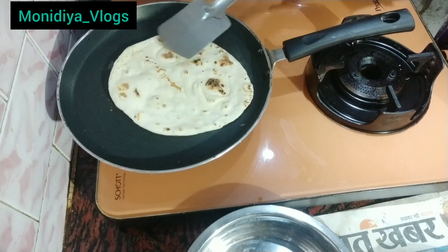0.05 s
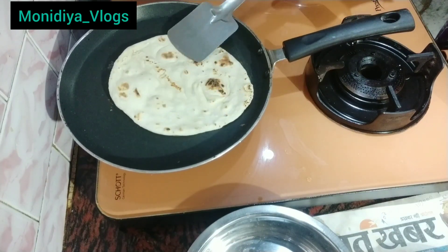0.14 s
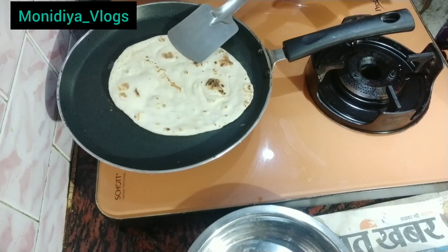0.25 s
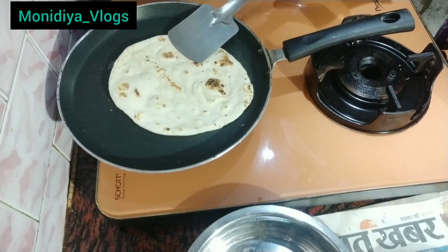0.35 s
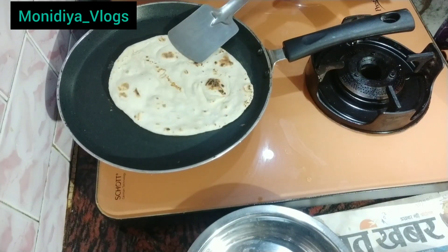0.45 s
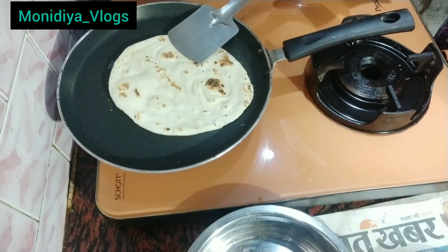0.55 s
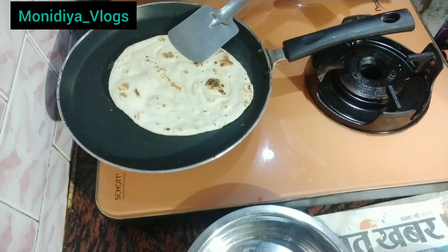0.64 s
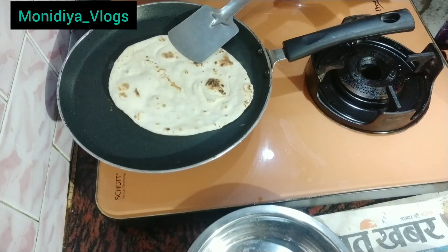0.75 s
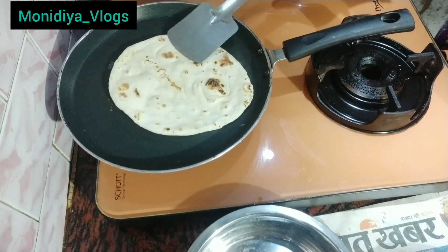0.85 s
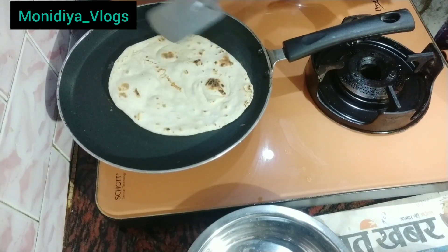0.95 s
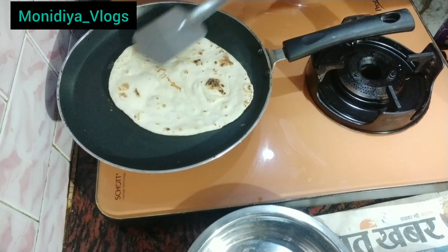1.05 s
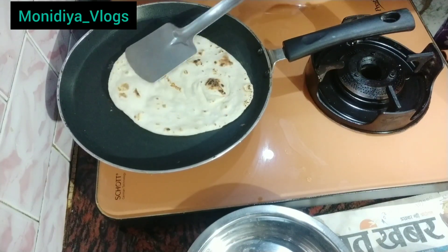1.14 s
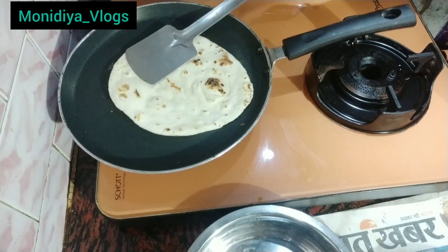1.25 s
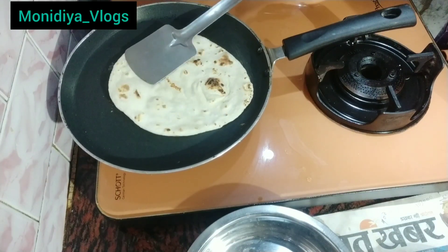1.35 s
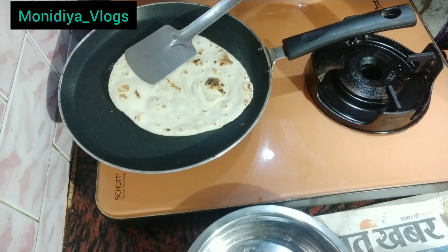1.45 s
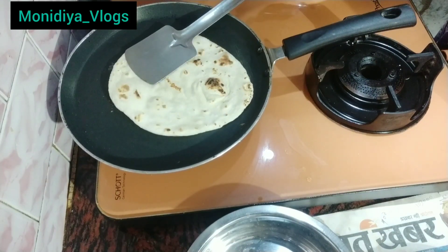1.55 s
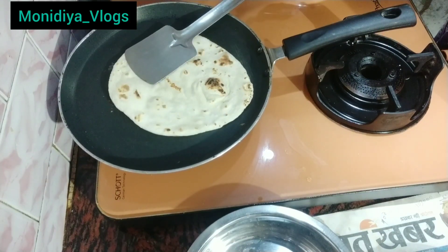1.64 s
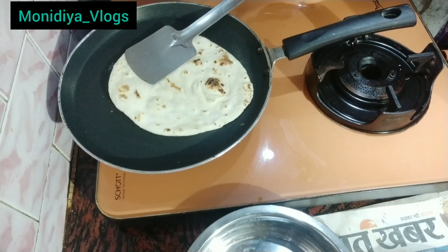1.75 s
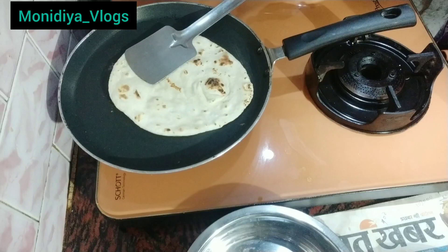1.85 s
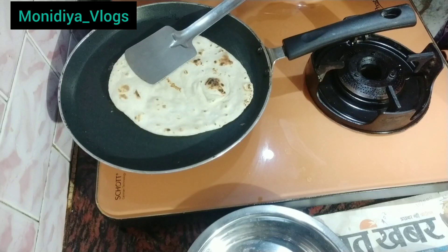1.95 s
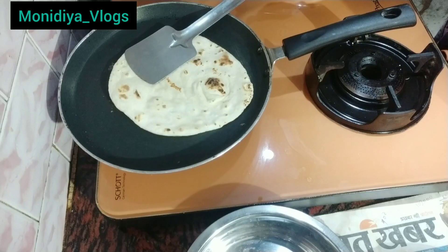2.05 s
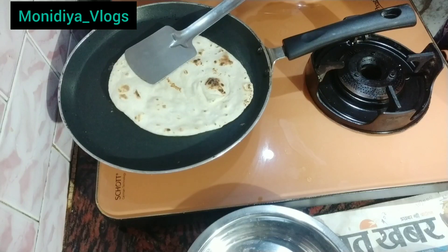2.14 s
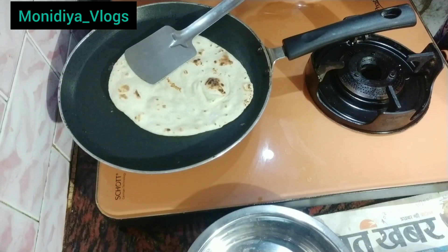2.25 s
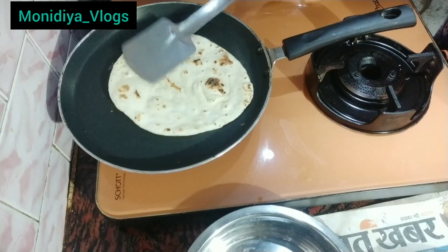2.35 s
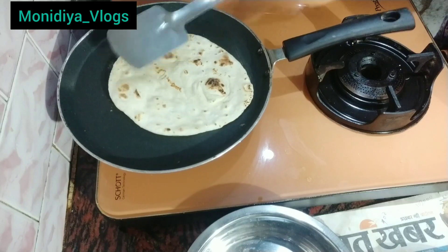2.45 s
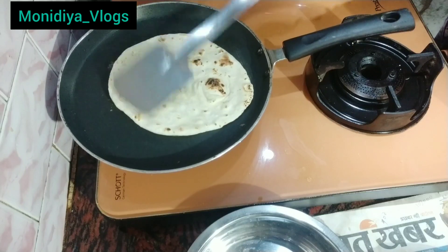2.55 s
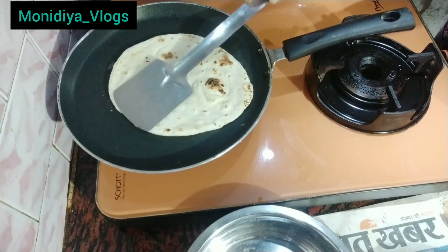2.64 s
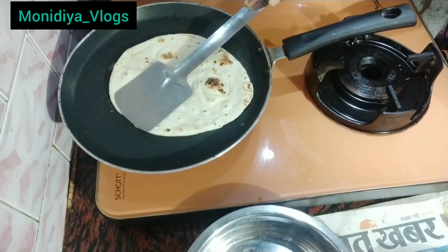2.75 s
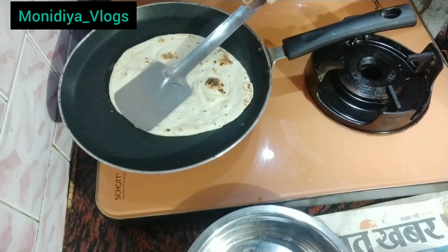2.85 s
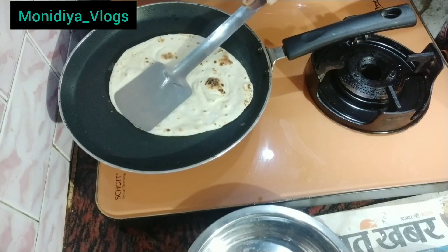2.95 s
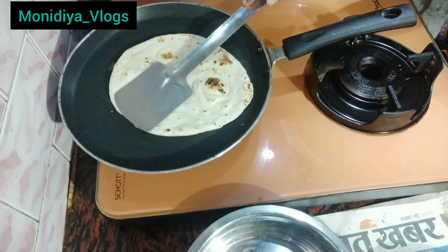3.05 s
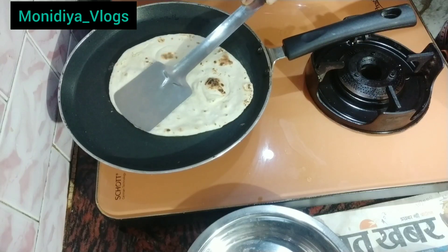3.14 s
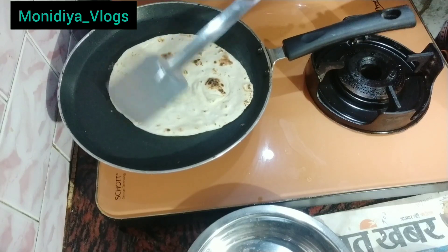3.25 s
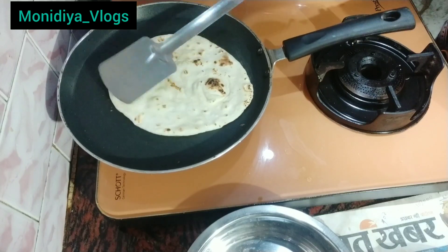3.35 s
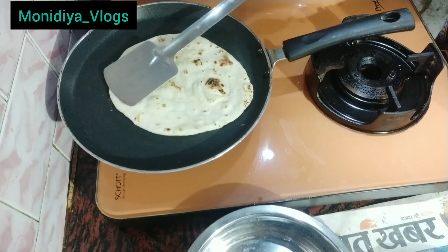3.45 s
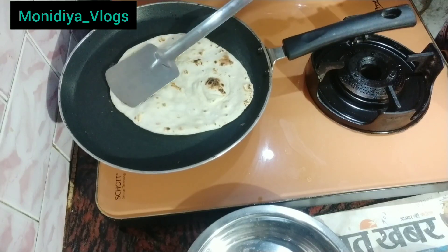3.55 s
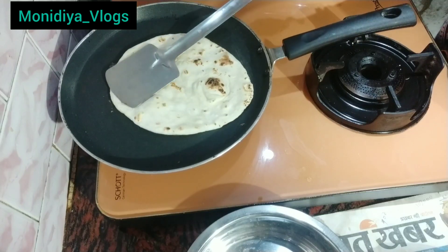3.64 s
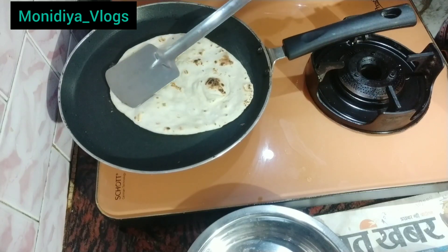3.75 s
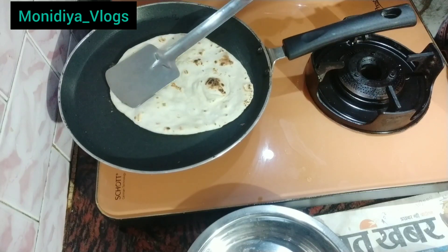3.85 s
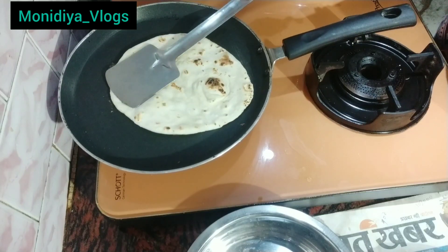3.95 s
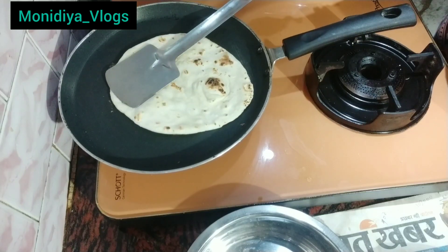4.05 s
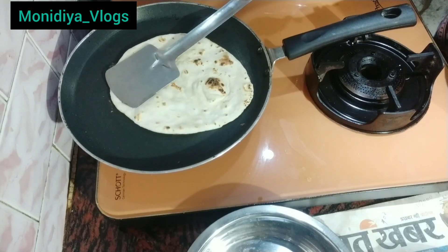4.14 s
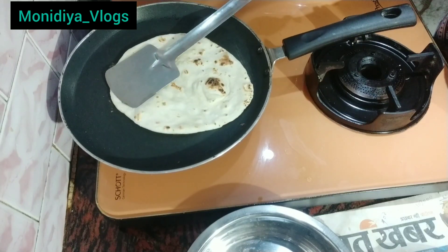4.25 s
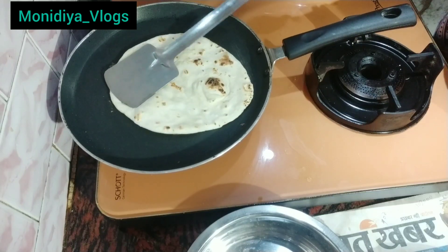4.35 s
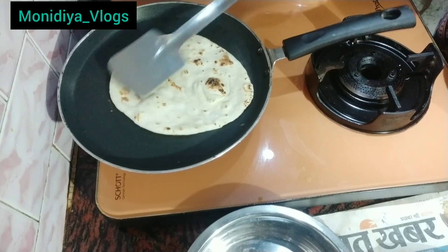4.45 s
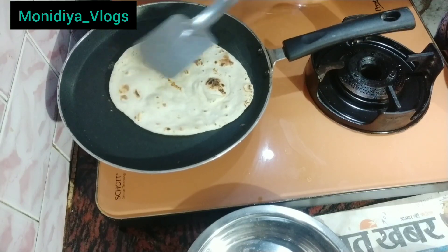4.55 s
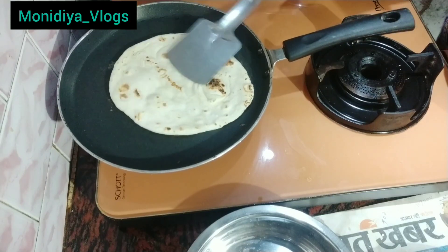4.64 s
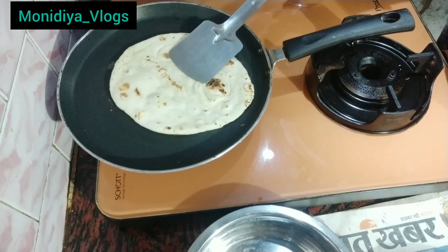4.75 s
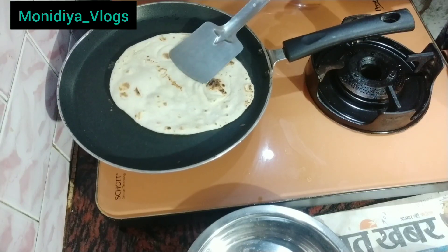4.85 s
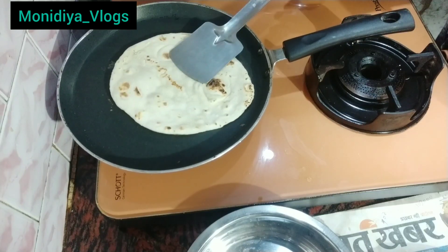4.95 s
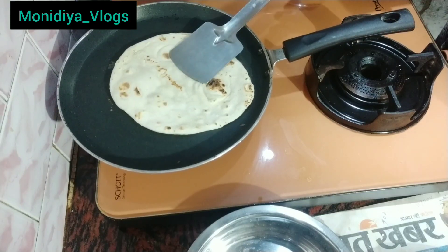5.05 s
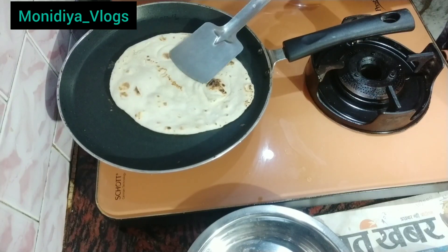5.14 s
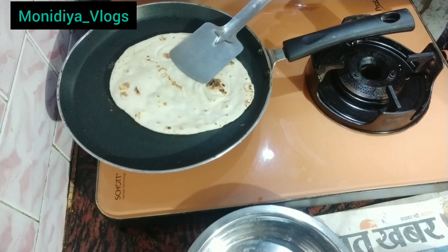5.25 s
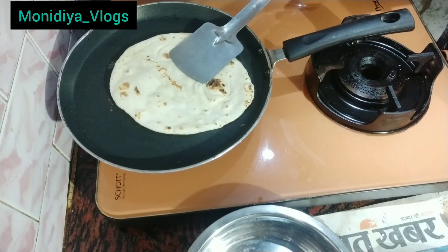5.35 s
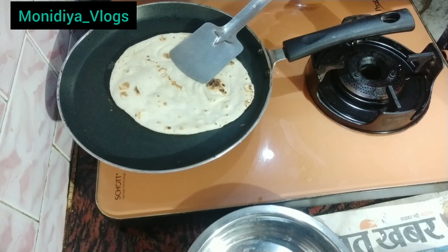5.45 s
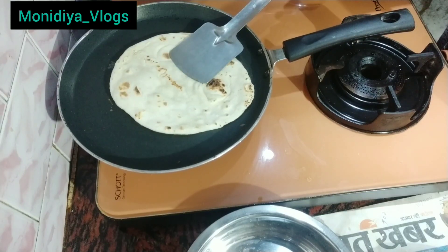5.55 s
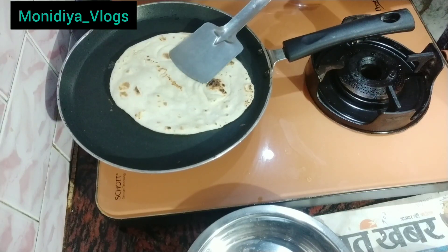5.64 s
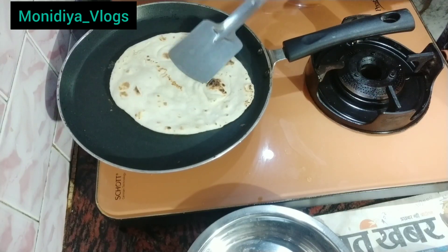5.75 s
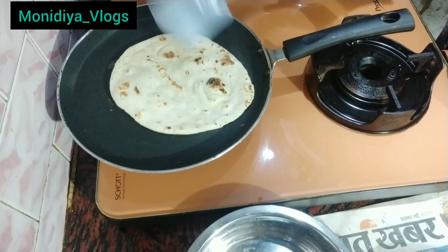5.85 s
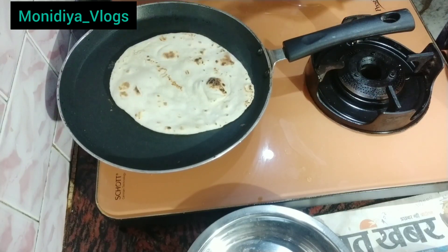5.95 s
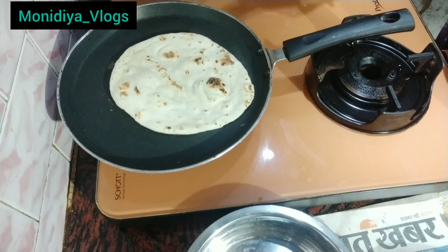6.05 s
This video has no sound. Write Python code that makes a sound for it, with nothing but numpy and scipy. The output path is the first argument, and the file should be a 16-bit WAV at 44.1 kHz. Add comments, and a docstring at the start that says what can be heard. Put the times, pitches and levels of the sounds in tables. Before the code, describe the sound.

A metal spatula knocks and clatters against a pan in bursts while flatbread crackles and sizzles softly over a low burner murmur in a tiled kitchen.

```python
"""A burner and a street murmur, with a thin motor whine and the sizzle of flatbread in a hot pan.
Throughout, crackles (steam bursts of shaped noise) mix with the knocks, bounces and presses of a steel
spatula: struck modes ring its edge, its blade and the pan, noise makes the rattle, in a tiled kitchen.
Faint gliding sines and a whistle come from outdoors; steps in the left line make electrical ticks.
Two microphone ports hear the scene; the right one faces the pan and is much brighter."""
import sys
import numpy as np
from scipy import signal
from scipy.fft import rfft, irfft, next_fast_len
from scipy.io import wavfile
from scipy.ndimage import uniform_filter1d

SR = 44100
rng = np.random.default_rng(int(sys.argv[2]) if len(sys.argv) > 2 else 0)


def to_wav(s):
    """Save 16-bit WAV."""
    ch = np.atleast_2d(s).T  # columns
    pcm = np.round(np.clip(ch, -1, 1) * 32767)  # PCM
    wavfile.write(sys.argv[1], SR, pcm.astype(np.int16))


N = 268701  # length [samples]


def amp(db):
    """Decibels to a linear gain."""
    return 10 ** (np.asarray(db) / 20)


def evened(x):
    """Scale to an rms of one."""
    return x / np.sqrt(np.mean(x ** 2) + 1e-20)


def read(points, hz):
    """Read a curve at the given frequencies, straight between points on a log frequency axis."""
    f, value = np.transpose(points)
    return np.interp(np.log(hz + 1), np.log(f + 1), value)


def add(mix, s, sound):
    """Lay a sound into the mix from time s, cut at the end of the mix."""
    part = mix[..., round(s * SR):][..., :sound.shape[-1]]
    part += sound[..., :part.shape[-1]]


def smooth_noise(shape, samples):
    """Slow random movement with an rms of one."""
    return evened(uniform_filter1d(rng.standard_normal(shape), samples))


# left-right likeness of steady noise, before each layer scales it: (frequency [Hz], likeness [0-1])
NOISE_LIKENESS = [(60, 1), (150, 0.67), (380, 0.71), (950, 0.046), (2380, 0.033), (5980, 0.03),
                  (15000, 0.02)]
# left port against right, before any shadow factor: (frequency [Hz], level difference [dB])
LEFT_DB = [(120, -6), (300, -0.5), (700, -1.5), (1300, 1.55), (2400, -2), (4400, -6), (6500, -5.5),
           (9000, -17), (12000, -13.5), (15000, -5)]


def hiss(colour, likeness, patchy_db):
    """Two-port noise shaped in frequency, with patches of level that drift over time and pitch."""
    frames, hz = N // 256 + 5, np.fft.rfftfreq(1024, 1 / SR)
    a, b, c, d, patches = rng.standard_normal((frames, 513, 5)).T
    patches = evened(uniform_filter1d(uniform_filter1d(patches, 8, 0), 10, 1))
    same = np.clip(likeness * read(NOISE_LIKENESS, hz), -1, 1)[:, None]
    right, own = a + 1j * b, c + 1j * d
    left = same * right + np.sqrt(1 - same ** 2) * own
    left = left * amp(read(LEFT_DB, hz))[:, None]
    shape = amp(read(colour, hz)[:, None] + patchy_db * patches)
    spectra = np.array([left, right]) * shape
    return evened(signal.istft(spectra, nperseg=1024, noverlap=768)[1][:, :N])


# burner and street colour: (frequency [Hz], relative density [dB per Hz])
MURMUR_COLOUR = [(18, -71), (30, 10.5), (112, -53), (167, -2.5), (331, -4), (694, -15.5), (904, -16.5),
                 (1660, -23.5), (2530, -24), (3130, -18.5), (3470, -28), (4410, -26.5), (13000, -19),
                 (15200, -24.5), (16500, -62)]


def murmur():
    """Burner and street as one steady, patchy noise, heavy in the bass."""
    return amp(-48) * hiss(MURMUR_COLOUR, 1.334, patchy_db=2.27)


# swell of the frying, shared by the sizzle and the small pops: (time [s], relative level [dB])
SIZZLE_SWELL = [(0.0, -49.5), (0.17, -55.5), (0.96, -59), (1.19, -52), (1.33, -45.5), (1.55, -55),
                (2.4, -56.5), (2.65, -46), (2.83, -47), (3.14, -53), (3.37, -60), (3.49, -47),
                (3.78, -57.5), (4.15, -55), (4.58, -49), (4.9, -54.5), (5.75, -49), (6.09, -63)]
# colour of the frying: (frequency [Hz], relative density [dB per Hz])
SIZZLE_COLOUR = [(2060, -25), (3500, -3), (6070, -4.5), (6520, -8), (8510, 1.5), (13800, -6.5),
                 (16000, -16), (16500, -77)]


def sizzle_gain(trim_db):
    """The frying level over time, as a gain."""
    return amp(np.interp(np.arange(N) / SR, *np.transpose(SIZZLE_SWELL)) + trim_db)


def sizzle():
    """The frying bread as bright noise that swells and sinks."""
    return sizzle_gain(-9.5) * hiss(SIZZLE_COLOUR, .3, patchy_db=0.0)


# left-right likeness of reflections, rattles and bursts: (frequency [Hz], likeness [0-1])
BURST_LIKENESS = [(100, 0.99), (500, 0.77), (900, 0.16), (1500, 0), (15000, 0)]


def burst(colour_db, noise):
    """Noise of a given colour (dB per frequency bin) at both ports, alike in the bass only."""
    left, right = rfft(noise)
    same = np.clip(read(BURST_LIKENESS, np.linspace(0, SR / 2, len(left))), 0, 1) ** 0.79
    left = same * right + np.sqrt(1 - same ** 2) * left
    return evened(irfft(np.array([left, right]) * amp(colour_db)))


def small_pops():
    """Random tiny pops, about 250 a second in six shapes, whose level follows the sizzle."""
    size = amp(2.7 * np.minimum(rng.exponential(1, N), 4)) * (rng.random(N) < 250 / SR)
    kind, t = rng.integers(0, 6, N), np.arange(400) / SR
    colour_db = 1.1 * read(SIZZLE_COLOUR, np.fft.rfftfreq(400, 1 / SR))
    out = np.zeros((2, N))
    for k, noise in enumerate(rng.standard_normal((6, 2, 400))):
        pop = burst(colour_db, noise) * amp(-60 * t / 0.0096)
        out += signal.oaconvolve((size * (kind == k))[None], pop, axes=1)[:, :N]
    return sizzle_gain(-4.0) * evened(out)


def tone(start, end, hz0, hz1, db0, db1, waver, fade):
    """A faint sine that glides evenly and flutters in level and pitch."""
    t = np.arange(0, end - start, 1 / SR)
    level_flutter, phase_flutter = smooth_noise(len(t), 600), smooth_noise(len(t), 600)
    phase = 2 * np.pi * np.cumsum(np.linspace(hz0, hz1, len(t))) / SR
    wave = np.sqrt(2) * np.sin(phase + waver * phase_flutter)
    level = amp(np.linspace(db0, db1, len(t))) * (1 + waver * level_flutter)
    edges = np.minimum(np.minimum(t, t[::-1]) / fade, 1)
    return start, level * wave * edges


# partials of the motor whine: (frequency [Hz], level [dB rms before the ports])
WHINE = [(3020, -64), (3171, -66.5), (3268, -69)]


def whine():
    """Steady high sines of a motor, wavering slightly."""
    out = np.zeros(N)
    for hz, db in WHINE:
        add(out, *tone(0, N / SR, hz, hz, db, db, waver=0.041, fade=.001))
    return out


# far tones: (start [s], end [s], start pitch [Hz], end pitch [Hz], start level [dB], end level [dB])
FAR_TONES = [(0.0, 0.497, 932, 935, -64, -70), (1.8, 2.04, 770, 792, -65, -65),
             (2.04, 2.398, 832, 872, -57.5, -69), (5.5, 6.091, 822, 910, -70, -62.5),
             (5.981, 6.11, 696, 633, -59, -48)]


def far_tones():
    """Gliding sines from outdoors."""
    out = np.zeros(N)
    for row in FAR_TONES:
        add(out, *tone(*row, waver=0.17, fade=0.015))
    return out


# colour of a steam burst before its tilt: (frequency [Hz], relative density [dB per Hz])
CRACKLE_COLOUR = [(470, -25), (800, -4.5), (1660, -5), (2530, -7.5), (3510, -3.5), (4240, -11),
                  (6650, -4.5), (10400, -1.5), (11600, -12), (14100, -9.5), (16000, -25)]
RUSTLE_T60_S, CRACKLE_RISE_S = 0.034, 0.00032


def crackle(db, tilt_db, noise):
    """A burst of steam: a sharp start, then a short rustle."""
    t, hz = np.arange(noise.shape[1]) / SR, np.fft.rfftfreq(noise.shape[1], 1 / SR)
    puff = burst(read(CRACKLE_COLOUR, hz) + tilt_db * np.log2((hz + 50) / 8000), noise)
    fall = amp(-60 * t / RUSTLE_T60_S) + 2.0 * amp(-60 * t / 0.0046)
    return amp(db - 10.5) * puff * fall * (1 - np.exp(-t / CRACKLE_RISE_S))


# crackles of the hot bread: (time [s], relative level [dB], brightness [dB per octave])
CRACKLES = [(0.049, -14.5, 13.5), (0.104, -34, -9), (0.1112, -17, 3), (0.1384, -30, 11), (0.166, -28, 10),
            (0.1824, -34, 7), (0.5077, -30.5, 4), (0.767, -26, 3), (1.138, -30, 1), (1.1455, -11.5, 5),
            (1.1657, -29, -0.5), (1.259, -26, 6), (1.273, -24, 8), (1.29, -26, 7), (1.3, -32, 10),
            (1.366, -33, 2), (1.4067, -25, 13), (1.4733, -28, 12), (1.479, -23.5, 6), (1.4845, -27.5, 0.5),
            (1.492, -18, 9), (1.52, -22, 4.5), (1.571, -32.5, 1.5), (1.607, -32, 4), (1.6506, -21.5, 13),
            (1.6645, -19, 2.5), (1.7463, -22, 15), (1.7647, -26, 2.5), (1.8563, -34, 8), (1.8912, -16, 4),
            (2.1085, -27, 7), (2.1317, -30.5, 2.5), (2.6397, -13.5, 3), (2.84, -28, 0), (2.9877, -34.5, 1),
            (3.1297, -30, 6), (3.3891, -20.5, -3.5), (3.684, -30, 3), (3.826, -32, 3.5),
            (3.9494, -26.5, 12), (4.007, -34, 8), (4.4023, -34, 1), (4.4218, -28.5, 1), (4.4364, -28.5, 3),
            (4.6566, -19, 8), (4.7987, -18, 3), (4.8214, -31, 13), (4.9196, -24.5, 12), (4.952, -31, 1.5),
            (5.2968, -30.5, 3.5), (5.354, -25.5, 7), (5.5273, -28.5, 3), (5.6173, -26.5, 3),
            (5.9154, -20.5, 8), (5.944, -37, 12)]


def crackles():
    """The loud crackles, steam bursting from the bread."""
    out = np.zeros((2, N))
    puffs = rng.standard_normal((len(CRACKLES), 2, 4096))
    for (s, db, tilt_db), noise in zip(CRACKLES, puffs):
        add(out, s, crackle(db, tilt_db, noise))
    return out


def ring(modes, place, contact_s, chatter):
    """Modes struck at one place; a soft contact fades them in, loose contact roughens them."""
    t = np.arange(8192) / SR
    hz, db, t60 = np.transpose(modes)[:, :, None]
    place = place[:len(modes), None]
    wobble = chatter * smooth_noise((len(modes), len(t)), 150)
    heights = amp(db + 2.2 * place)
    detune = 1 + 0.0059 * place[::-1]
    tones = heights * amp(-60 * t / t60) * np.sin(2 * np.pi * hz * detune * t + wobble)
    sound = tones.sum(0) * (1 - np.exp(-t / contact_s))
    return sound / abs(sound).max()


def first_contact(edge_db, noise):
    """Steel scratching at the touch: bright noise with a fast and a slower fall."""
    t, hz = np.arange(8192) / SR, np.fft.rfftfreq(8192, 1 / SR)
    colour_db = read([(500, -47), (2000, 2.0), (6000, 2.0), (10000, 0.5), (16000, -24)], hz)
    fall = amp(-60 * t / 0.04) + 1.36 * amp(-60 * t / 0.0062)
    return amp(edge_db - 10) * fall * burst(colour_db, noise)


# pan shaking on its grate, before its tilt: (frequency [Hz], relative density [dB per Hz])
RATTLE_COLOUR = [(71, -45), (120, -71), (203, 3.5), (372, 4), (1110, -4.5), (1470, -11.5), (2160, -8.5),
                 (4740, -12), (6290, -22), (9620, -64), (15000, -74)]
# sharpness is edge level above rattle level
RATTLE_T60_S, LONGER_S_PER_DB = 0.08, 0.0219
RATTLE_TILT_DB, BRIGHTER_PER_DB = -1, 0.12  # dB per octave, and its change per dB of sharpness
CLATTER_DB = 1  # unevenness of the rattle


def rattle(edge_db, rattle_db, noise):
    """The pan shakes as uneven noise; a sharper knock makes it brighter, and longer above zero sharpness."""
    t, hz = np.arange(8192) / SR, np.fft.rfftfreq(8192, 1 / SR)
    sharp_db = edge_db - rattle_db
    t60 = RATTLE_T60_S + LONGER_S_PER_DB * max(sharp_db, 0)
    tilt_db = RATTLE_TILT_DB + BRIGHTER_PER_DB * sharp_db
    shake = burst(read(RATTLE_COLOUR, hz) + tilt_db * np.log2((hz + 50) / 600), noise[1])
    shake *= amp(CLATTER_DB * evened(uniform_filter1d(noise[0, 0], 120)))
    return amp(rattle_db - 60 * t / t60) * (1 - np.exp(-t / 0.0017)) * shake


# modes before each knock shifts them: (frequency [Hz], relative level [dB], t60 [s])
EDGE = [(3250, -2, 0.033), (4158, -1.5, 0.081), (4745, 7.5, 0.033), (4850, -6, 0.058), (5460, -9.5, 0.073),
        (5810, -1, 0.056), (6790, 3, 0.05), (8500, -48, 0.0097), (8960, 12, 0.021), (9270, -5, 0.019)]  # the steel edge
BLADE = [(831, -10.5, 0.048), (884.6, -1, 0.033), (970, -20.5, 0.07)]  # the short-ringing blade, low modes
BLADE_UPPER = [(1239, -12.5, 0.087), (1457, -2, 0.023), (1633, -9.5, 0.046), (2390, -10, 0.02),
               (2696, -22, 0.061)]  # the blade, upper modes
PAN = [(249.5, 8.5, 0.21), (338.5, 3, 0.42), (361, 5.5, 0.25), (378, -9.5, 0.097), (458, -1, 0.081),
       (514, 3.5, 0.33), (589.3, 8.5, 0.16), (670, 1, 0.2), (840, -24, 0.068)]  # the pan under the bread
# spatula meeting the pan, relative levels:
# (time [s], edge crack [dB], blade ring [dB], pan thud [dB], rattle [dB])
KNOCKS = [(0.1117, -31, -37.5, -54, -49.5), (0.1802, -37.5, -46, -47, -73), (1.0798, -57, -40, -48, -45),
          (1.2215, -54, -32.5, -31, -34), (1.2333, -29, -29, -25, -19), (1.2416, -16, -16, -38, -12.5),
          (2.4189, -8, -10, -21.5, -24.5), (2.4433, -12, -23, -24, -11), (2.5306, -20, -12, -23, -15),
          (2.5933, -33, -46, -48, -27), (2.6034, -30.5, -18, -61, -35), (2.7001, -53, -33, -21.5, -22.5),
          (2.7268, -6, -17, -21, -23), (3.0359, -59, -52, -50, -53), (3.3018, -9.5, -9.5, -19.5, -21.5),
          (3.3256, -13, -19, -24, -14.5), (3.4202, -24, -14, -33, -20), (3.5259, -42, -23, -25.5, -16),
          (3.543, -13, -17, -19.5, -13.5), (4.495, -9, -11, -18.5, -24), (4.5121, -39, -16, -24.5, -23),
          (4.5194, -12, -16.5, -25.5, -13), (4.605, -17, -12.5, -23, -18.5), (4.6761, -28, -16.5, -41, -25),
          (4.7345, -33.5, -16, -34, -25), (4.7881, -71, -26.5, -40, -33), (4.843, -64, -45, -53, -41),
          (5.4685, -50, -50, -55, -44), (5.8094, -41, -44, -60, -44), (5.8682, -46, -50, -69, -64)]
UPPER_EDGE_SHARE = 0.23  # the upper blade modes lie between edge and blade in level
UPPER_DAMPED_PER_DB = 0.16  # a knock that rattles more than it thuds damps the upper modes


def spatula():
    """Each knock rings the edge, the blade and the pan in its own shares, and shakes the pan."""
    out = np.zeros((2, N))
    places = rng.standard_normal((len(KNOCKS), 10))
    scratches = rng.standard_normal((len(KNOCKS), 2, 2, 8192))
    for row, place, noise in zip(KNOCKS, places, scratches):
        s, edge_db, blade_db, pan_db, rattle_db = row
        upper_db = UPPER_EDGE_SHARE * edge_db + (1 - UPPER_EDGE_SHARE) * blade_db
        upper_db -= UPPER_DAMPED_PER_DB * np.clip(rattle_db - pan_db, -10, 15)
        add(out, s, amp(edge_db - 2.5) * ring(EDGE, place, 0.00018, chatter=0.88))
        add(out, s, first_contact(edge_db, noise[0]))
        add(out, s, amp(blade_db + 1.5) * ring(BLADE, place, 0.00048, chatter=0.38))
        add(out, s, amp(upper_db + 0.03) * ring(BLADE_UPPER, place, 0.0012, chatter=0.54))
        add(out, s, amp(pan_db + 1.0) * ring(PAN, place, 0.0079, chatter=0.06))
        add(out, s, rattle(edge_db, rattle_db, noise))
    return out


# electrical ticks in the left channel: a short dip in the line, twice in every cycle
TICK_FIRST_S, TICK_CYCLE_S, TICK_SECOND_S = 0.4647, 1.2785, 0.5297
TICK_LENGTH_S, TICK_SPREAD_S, TICK_DB, TICK_LOW_HZ = 0.0139, 0.0004, -25.5, 140


def ticks():
    """The left line steps down and back up; a high-pass turns each step into a dry tick."""
    starts = TICK_FIRST_S + np.add.outer(TICK_CYCLE_S * np.arange(5), [0, TICK_SECOND_S]).ravel()
    lengths = TICK_LENGTH_S + TICK_SPREAD_S * rng.standard_normal(len(starts))
    line = np.zeros((2, N))
    for s, length in zip(starts, lengths):
        add(line[0], s, -np.ones(round(length * SR)))
    high_pass = signal.butter(4, TICK_LOW_HZ, "high", fs=SR, output="sos")
    return amp(TICK_DB) * signal.sosfilt(high_pass, line)


# modes of the flat of the blade, before each clink shifts them:
# (frequency [Hz], relative level [dB], t60 [s])
CLINK_MODES = [(3560, -5, 0.1), (4650, -9, 0.25), (4770, 0, 0.049), (5000, 6, 0.049), (5765, 1, 0.068),
               (6300, -14, 0.058), (8200, -16, 0.034), (9860, 4, 0.1), (10620, -8, 0.034)]
# the flat of the blade clinks: (time [s], relative level [dB])
CLINKS = [(0.768, -47), (1.1453, -21), (1.1657, -32), (1.4787, -43), (1.8909, -56), (2.6395, -20),
          (3.3892, -33), (3.6497, -46), (3.683, -36), (4.4214, -41), (4.7999, -30), (4.8214, -34),
          (4.9518, -43), (5.3546, -43), (5.6178, -47)]


def clinks():
    """The flat of the blade, rung roughly by a crackle under it."""
    out = np.zeros((2, N))
    for (s, db), place in zip(CLINKS, rng.standard_normal((len(CLINKS), 10))):
        add(out, s, amp(db) * ring(CLINK_MODES, place, 0.0002, chatter=1.63))
    return out


# the pan drops back on its grate just after a hard knock: (time [s], relative level [dB])
DROPS = [(2.4446, -9), (3.3286, -14), (4.521, -14)]
DROP_S = 0.00028  # Gaussian spread (standard deviation) of the single push [s]


def drops():
    """One short push of air each time the pan lands, centred on its time."""
    out, u = np.zeros((2, N)), np.arange(-200, 200) / SR / DROP_S
    for s, db in DROPS:
        add(out, s - 200 / SR, -amp(db) * (1 - 0.8 * u ** 2) * np.exp(-u ** 2 / 2))
    return out


# a thin whistle from outdoors, in pieces: (start [s], end [s], level [dB])
WHISTLES = [(5.388, 5.474, -57), (5.462, 5.625, -50), (5.622, 5.94, -52.5), (5.961, 6.01, -52),
            (6.034, 6.1, -67)]
WHISTLE_HZ = 3317


def whistles():
    """A fluttering sine around one pitch, in faded pieces."""
    out = np.zeros(N)
    for start, end, db in WHISTLES:
        add(out, *tone(start, end, WHISTLE_HZ, WHISTLE_HZ, db, db, waver=0.35, fade=.012))
    return out


# how far the left port leads the right: (frequency [Hz], phase [radians])
LEFT_LEAD = [(30, 4), (700, -0.57), (1100, 1.23), (1640, 5.5), (3600, 5), (16000, 11.5)]


def ports(x, shadow):
    """The left port is shadowed in the treble; the right one is turned in phase against it."""
    size = next_fast_len(N + 4096)
    hz = np.fft.rfftfreq(size, 1 / SR)
    left, right = rfft(x, size)
    left = left * amp(shadow * read(LEFT_DB, hz))
    right = right * np.exp(-1j * read(LEFT_LEAD, hz))
    return irfft([left, right], size)[:, :N]


# decay of the tiled room: (frequency [Hz], t60 [s])
KITCHEN_T60 = [(150, 0.8), (400, 0.25), (1040, 0.28), (2760, 0.44), (7280, 0.34), (15000, 0.36)]


def echoes():
    """Sparse reflections dying band by band; both ports share them in the bass."""
    taps = np.zeros((2, SR // 2))
    jitter = rng.integers(0, 20, (2, (SR // 2 - 91) // 20))
    at = np.arange(90, SR // 2 - 20, 20) + jitter
    np.put_along_axis(taps, at, rng.choice([-1., 1.], at.shape), 1)
    hz, t, z = signal.stft(taps, SR, nperseg=256)
    same = np.clip(read(BURST_LIKENESS, hz), 0, 1)[:, None]
    left = same * z[1] + np.sqrt(1 - same ** 2) * z[0]
    left = left * amp(read(LEFT_DB, hz))[:, None]
    decay = amp(-60 * t / read(KITCHEN_T60, hz)[:, None])
    tail = signal.istft(np.array([left, z[1]]) * decay, SR, nperseg=256)[1]
    return tail / np.linalg.norm(tail[1])


def kitchen(x):
    """Reflections of the small room, blended steadily among three echo patterns."""
    turn = np.pi * 9 * np.arange(N) / SR
    out = np.zeros((2, N))
    for k in range(3):
        share = np.sqrt(2 / 3) * np.cos(turn + k * np.pi / 3)
        out += signal.fftconvolve((x * share)[None], echoes(), axes=1)[:, :N]
    return out


def scene():
    """Balance the direct sounds, their reflections, the steady noises and the ticks."""
    knocks = spatula() + drops()
    bread = crackles() + clinks() + small_pops()
    tones = whine() + far_tones() + whistles()
    near = ports(knocks + tones, shadow=1.0) + ports(amp(4.5) * bread, shadow=1.6)
    reflected = kitchen((amp(-7.5) * knocks + amp(-1.5) * bread)[1])
    return near + reflected + sizzle() + murmur() + ticks()


def record(dry):
    """The microphone drops the bass and rounds off the hardest peaks; then the band limit."""
    thin = signal.sosfilt(signal.butter(2, 150, "high", fs=SR, output="sos"), dry)
    rounded = 1.2 * np.tanh(thin / 1.2)
    band_limit = signal.firwin(511, 16300, window=("kaiser", 9), fs=SR)  # low-pass, Hz
    return signal.oaconvolve(rounded, band_limit[None], "same")


dry = scene()
out = record(dry)
to_wav(out)
```